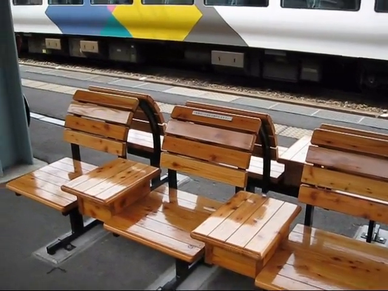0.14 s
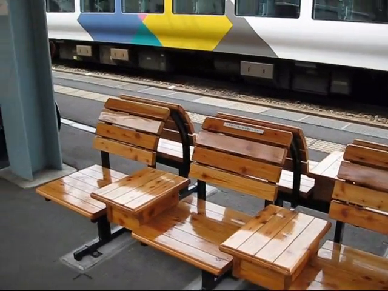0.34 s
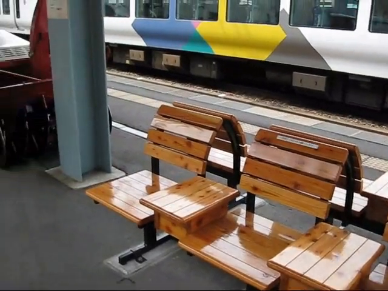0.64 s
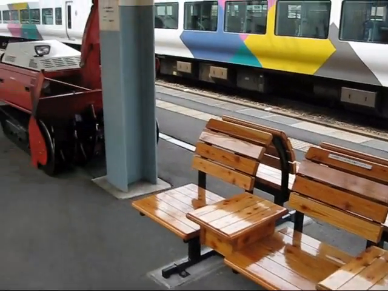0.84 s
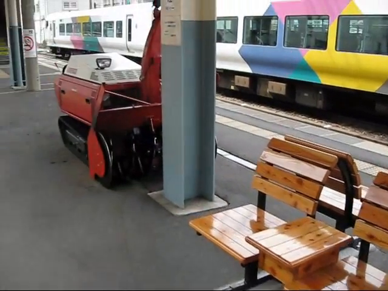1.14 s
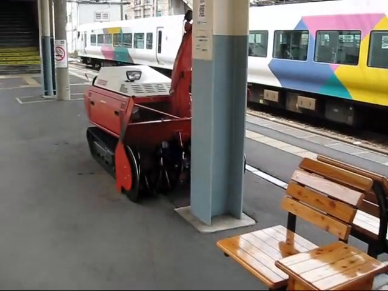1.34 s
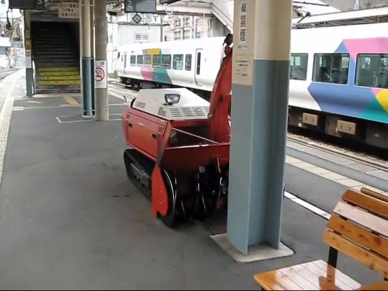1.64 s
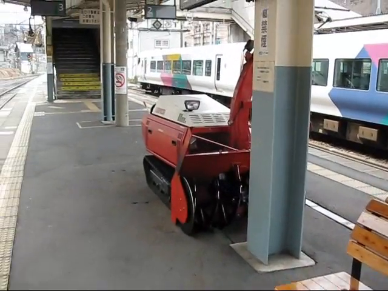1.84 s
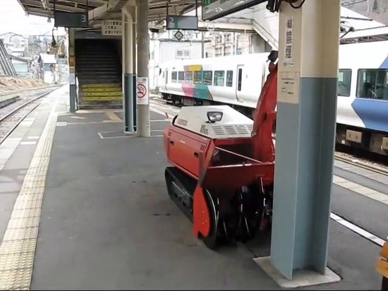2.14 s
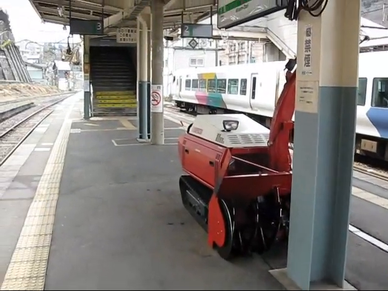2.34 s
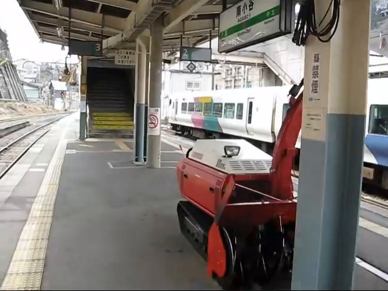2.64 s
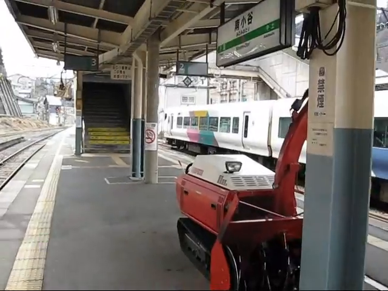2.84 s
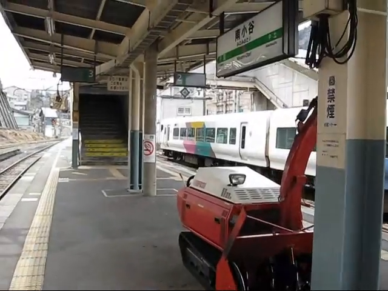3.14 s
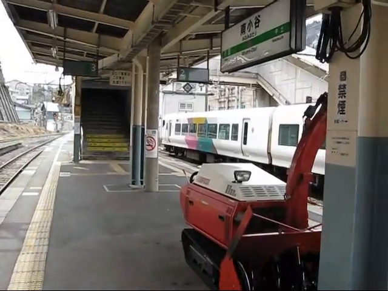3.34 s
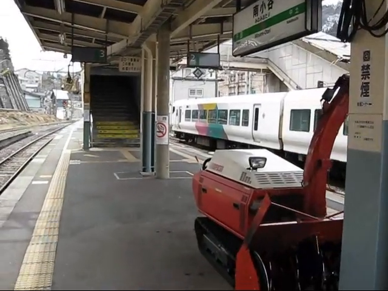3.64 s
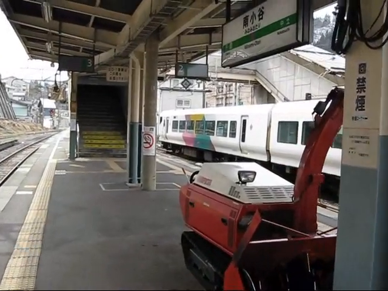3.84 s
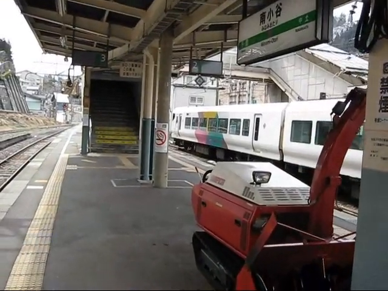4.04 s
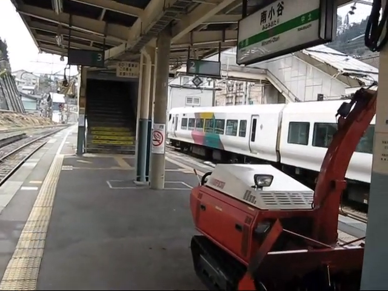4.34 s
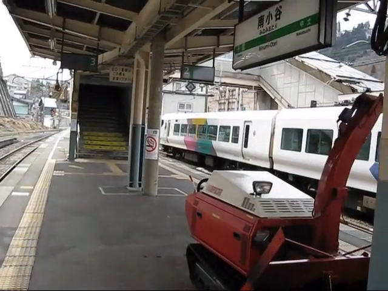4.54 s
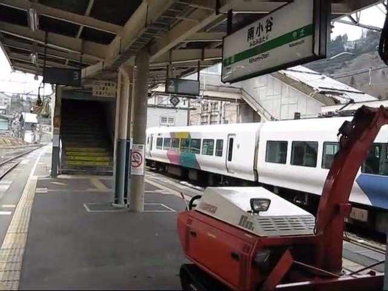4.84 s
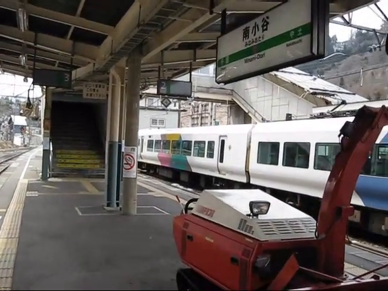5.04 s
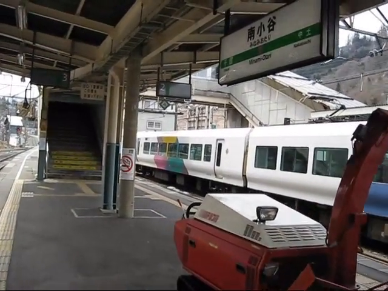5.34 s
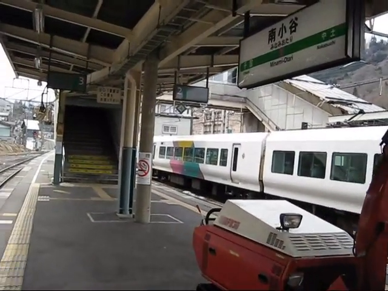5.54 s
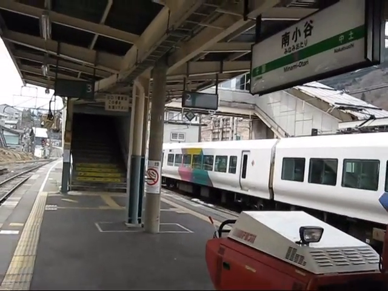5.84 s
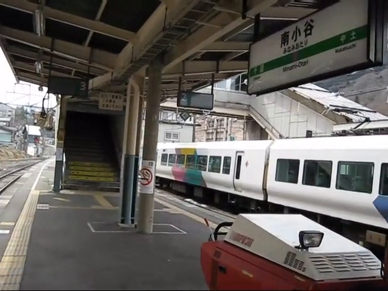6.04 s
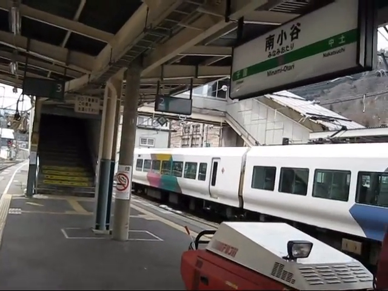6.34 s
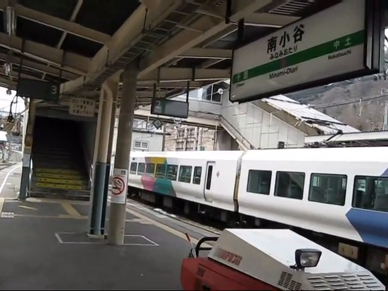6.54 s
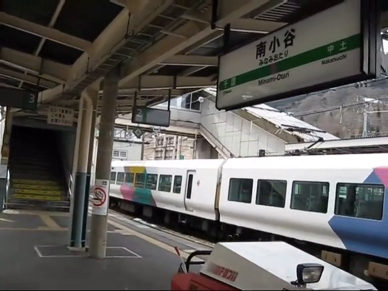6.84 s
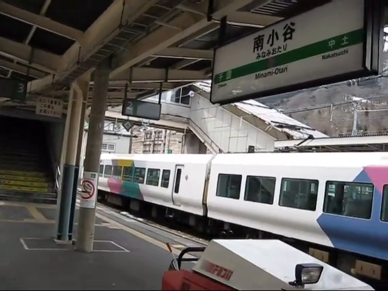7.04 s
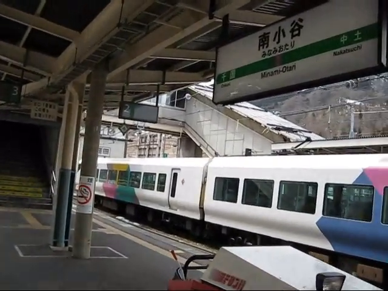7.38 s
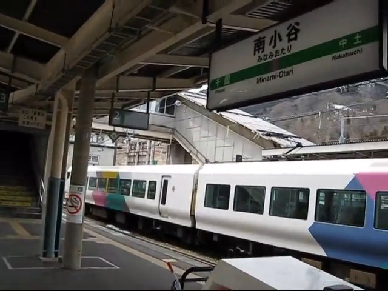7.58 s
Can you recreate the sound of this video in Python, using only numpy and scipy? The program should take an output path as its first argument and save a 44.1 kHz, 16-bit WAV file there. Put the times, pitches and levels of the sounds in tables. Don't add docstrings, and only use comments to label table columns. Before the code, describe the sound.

From 0 to about 7.7 seconds, a stationary electric train runs its equipment beside a roofed outdoor platform. A strong, thin whine around 3 kHz stands over a buzzing casing, fainter higher tones, wavering fan hums and a steady rush of air. At first the whine swells slowly and the sound is brightest; by about 1.4 seconds the treble has dulled a little as the handheld microphone turns away. From about 2.4 seconds echoes make the tones flutter and beat more quickly, continuing to the end. Faint far sparrows chirp at 0.2, 0.7 and 1 second, again around 4.2 to 4.8, at 5.3, and 6.3 to 6.5. Tiny dry plastic ticks occur close by at 3.2 and 6.35. A gentle low wind breath peaks near 5.2. Light hiss remains underneath; the machinery never stops.

```python
import sys
import numpy as np
from scipy import signal
from scipy.fft import rfft, irfft
from scipy.io import wavfile
from scipy.ndimage import uniform_filter1d

SR = 44100
rng = np.random.default_rng(int(sys.argv[2]) if len(sys.argv) > 2 else 0)


def master_out(mix):
    frames = np.transpose(np.atleast_2d(mix))
    ceiling = np.clip(frames, -1, 1)
    pcm = np.round(ceiling * 32767).astype(np.int16)
    wavfile.write(sys.argv[1], SR, pcm)


def field_ratio(decibels):
    return 10 ** (np.asarray(decibels, dtype=float) / 20)


N = 340002
MAINS_HZ = 60
SOUND_SPEED = 343


def walk(rate_hz):
    hold = int(SR / rate_hz)
    steps = np.repeat(rng.standard_normal(N // hold + 1), hold)
    return 1.3 * uniform_filter1d(uniform_filter1d(steps, hold), hold)[:N]


def columns(table):
    s, *rest = np.transpose(table)
    return [np.interp(np.arange(N) / SR, s, column) for column in rest]


def tone(hz, level_db):
    turns = np.cumsum(hz) / SR + rng.random()
    return np.sqrt(2) * field_ratio(level_db) * np.sin(2 * np.pi * turns)


def swells(rows, rest_db):
    t, gain = np.arange(N) / SR, np.full(N, field_ratio(rest_db))
    for peak_s, level_db, length_s in rows:
        i = max(int((peak_s - length_s / 2) * SR), 0)
        j = int((peak_s + length_s / 2) * SR)
        gain[i:j] += field_ratio(level_db) * np.cos(np.pi * (t[i:j] - peak_s) / length_s) ** 2
    return 20 * np.log10(gain)


# time_s, speed_m_per_s
SWING_SPEED = [
    (0, .09),
    (2, .14),
    (3.5, .4),
    (7.71, .45),
]
# mains_multiple, rest_level_db, echo_db
CHOKE_TONES = [
    (24, -60.5, -13),
    (48, -59, -9),
    (52, -52, -14),
    (54, -57.5, -10),
    (56, -52.5, -14),
    (78, -60.5, -8),
    (82, -61.5, -4),
    (84, -62, -5),
]
# peak_s, level_db, length_s
CHOKE_SWELLS_24 = [(0.16, -52.0, 1.1), (0.8, -48.5, 1.1), (2.66, -52.5, 0.45), (4.28, -56.5, 1.1),
                   (4.86, -52.5, 0.6), (5.24, -49.0, 0.34), (5.64, -49.5, 0.8), (6.06, -56.5, 0.8),
                   (6.82, -57.5, 0.6), (7.56, -55.0, 1.1)]
CHOKE_SWELLS_48 = [(0.16, -52.5, 0.8), (0.92, -51.0, 0.45), (1.4, -55.0, 0.8), (1.86, -51.0, 0.45),
                   (2.42, -57.0, 0.8), (2.9, -53.0, 0.26), (5.1, -53.5, 0.26), (5.44, -47.5, 0.2),
                   (5.94, -54.0, 0.8), (6.84, -53.5, 0.8), (7.24, -47.5, 0.26)]
CHOKE_SWELLS_52 = [(0.4, -43.0, 1.1), (1.2, -58.5, 1.1), (1.84, -49.0, 0.6), (2.18, -51.5, 0.34),
                   (2.52, -42.5, 0.34), (2.8, -45.0, 0.26), (2.94, -43.5, 0.2), (3.1, -48.0, 0.26),
                   (3.34, -44.0, 0.16), (3.4, -50.0, 0.12), (3.6, -48.5, 0.34), (3.84, -53.5, 0.16),
                   (4.0, -46.5, 0.16), (4.62, -53.5, 0.26), (4.82, -48.0, 0.2), (5.06, -43.0, 0.2),
                   (5.26, -53.0, 0.45), (5.54, -50.5, 0.2), (5.86, -46.5, 0.34), (6.12, -52.5, 0.6),
                   (6.34, -44.0, 0.2), (6.48, -47.5, 0.16), (6.74, -48.5, 0.16), (7.04, -47.5, 0.8),
                   (7.52, -50.0, 0.6)]
CHOKE_SWELLS_54 = [(0.56, -52.0, 0.8), (1.52, -54.5, 0.26), (1.9, -45.5, 0.6), (2.34, -49.5, 0.34),
                   (2.58, -53.5, 0.2), (2.7, -50.0, 0.2), (2.92, -51.5, 0.26), (3.5, -49.5, 0.2),
                   (3.88, -53.5, 0.8), (4.56, -53.0, 0.6), (5.22, -52.5, 0.8), (5.9, -50.0, 0.8),
                   (6.26, -54.0, 0.2), (6.54, -47.5, 0.45), (7.16, -51.5, 0.26), (7.48, -52.5, 0.16)]
CHOKE_SWELLS_56 = [(0.08, -39.5, 1.1), (0.86, -43.5, 0.34), (1.08, -42.5, 0.45), (1.64, -50.0, 1.1),
                   (2.36, -45.0, 0.16), (2.44, -39.5, 0.12), (2.5, -39.5, 0.12), (2.62, -46.0, 0.26),
                   (2.72, -41.0, 0.2), (2.98, -46.5, 0.2), (3.22, -54.0, 0.34), (3.44, -48.5, 0.2),
                   (3.7, -42.5, 0.45), (4.14, -47.5, 0.45), (4.4, -48.5, 0.6), (4.68, -40.5, 0.16),
                   (4.88, -48.0, 0.45), (5.32, -44.5, 0.2), (5.5, -48.0, 0.34), (5.66, -39.5, 0.2),
                   (5.78, -40.5, 0.16), (6.0, -43.5, 0.34), (6.42, -51.5, 1.1), (7.2, -42.5, 0.2),
                   (7.36, -40.5, 0.16), (7.48, -40.5, 0.16), (7.64, -39.5, 0.2)]
CHOKE_SWELLS_78 = [(0.3, -56.5, 0.6), (0.84, -46.5, 0.45), (1.14, -48.5, 0.26), (1.38, -55.5, 0.26),
                   (2.54, -55.5, 0.16), (3.32, -50.5, 0.16), (3.54, -49.5, 0.16), (4.06, -61.0, 0.6),
                   (4.64, -59.0, 0.45), (5.16, -57.5, 0.6), (5.5, -56.5, 0.26), (6.08, -54.5, 0.16),
                   (6.88, -59.0, 0.6), (7.22, -55.5, 0.16)]
CHOKE_SWELLS_82 = [(0.08, -56, 0.34), (0.88, -57.5, 0.8), (2.26, -66, 0.24), (3.9, -60, 0.54),
                   (4.62, -60, 0.51), (6.5, -69, 0.91), (6.96, -68, 0.8)]
CHOKE_SWELLS_84 = [(0.34, -51, 1.1), (1.12, -57, 0.26), (1.84, -61.0, 0.26), (2.6, -60.5, 0.67),
                   (3.36, -73, 1.2), (6.66, -68, 1.3), (7.48, -68, 1.1)]


def singing_chokes():
    shift = columns(SWING_SPEED)[0] / SOUND_SPEED
    echo_growth_db = 10 * np.log10(shift / shift.max())
    tables = (CHOKE_SWELLS_24, CHOKE_SWELLS_48, CHOKE_SWELLS_52, CHOKE_SWELLS_54,
              CHOKE_SWELLS_56, CHOKE_SWELLS_78, CHOKE_SWELLS_82, CHOKE_SWELLS_84)
    out = 0
    for (multiple, rest_db, echo_db), rows in zip(CHOKE_TONES, tables):
        level_db = swells(rows, rest_db)
        main_hz = MAINS_HZ * multiple * (1 + shift * (.3 * walk(3.0) - .5))
        out = out + tone(main_hz, level_db - .6)
        echo_hz = MAINS_HZ * multiple * (1 + shift * (.5 * walk(1.1) + .7))
        out = out + tone(echo_hz, level_db + echo_db + echo_growth_db + 3 * walk(3.0))
    return out


# mains_multiple, level_db
CASING_BUZZ = [(6, -58), (8, -60), (26, -63), (30, -60), (32, -61), (50, -62), (53, -65), (55, -63),
               (58, -62), (60, -62), (62, -68), (64, -66), (72, -71), (76, -67), (79, -70), (80, -68),
               (86, -70),
               (100, -76), (102, -68), (104, -66), (106, -64), (108, -65), (110, -70), (112, -72),
                    (114, -74), (126, -76), (128, -69), (130, -66), (132, -72), (166, -80), (134, -74),
                    (136, -72), (156, -73), (162, -79), (164, -73), (180, -79), (210, -81)]
BUZZ_DB = 1
COMB_DB = -84


def casing_buzz(near_db, paths=6):
    comb = [(multiple, COMB_DB) for multiple in range(116, 214, 2)]
    rows = np.array(CASING_BUZZ + comb)
    turn = np.arange(16385) / 16384
    shift = columns(SWING_SPEED)[0] / SOUND_SPEED
    out, power = 0, 0
    for speed in np.linspace(-1, 1, paths):
        start = rng.random((len(rows), 1))
        period = field_ratio(rows[:, 1]) @ np.sin(2 * np.pi * (rows[:, :1] * turn + start))
        hz = MAINS_HZ * (1 + shift * (speed + .3 * walk(1.5)))
        gain = field_ratio(5 * walk(1.3))
        out = out + gain * np.interp(np.cumsum(hz) / SR % 1, turn, period)
        power = power + gain ** 2
    return out * field_ratio(BUZZ_DB + near_db) * np.sqrt(2 / power)


# fan_group, pitch_hz, level_in_group_db, wander_hz
BLADE_TONES = [(0, 237, -8, .9), (0, 242.5, .5, 1.3), (1, 636, -1.5, 2.2), (1, 642, -4, 1.5),
               (1, 627, -5, 1.9), (2, 755.7, -2.5, 1.4), (2, 733.5, -3.5, 2.), (2, 721, -5.5, 1.5),
               (2, 742, -9, 2.9), (3, 960, -3, 1.8), (3, 976, -3, 1.6)]
# pitch_hz, level_db, wander_hz
SHAFT_HUMS = [(59.4, -64, 1.18), (133.9, -62, 0.967), (149.8, -69.5, 0.81), (801, -60.5, 2.2),
              (1010, -77, 3.6), (1698, -59.5, 3.4), (1893, -62, 8.4), (2670, -62.5, 7.64)]
FAN_REST_LEVELS = -58, -53, -49, -51.5
FAN_PITCH_CREEP = 0, 0, 0, 1.6
# peak_s, level_db, length_s
FAN_SWELLS_A = [(0.0, -49, 1), (0.68, -46, 1), (1.12, -46, 0.31), (1.52, -49.5, 0.45), (2.14, -65, 3.3),
                (3.12, -52.5, 1.05), (3.92, -50.5, 0.53), (5.9, -45, 0.17), (6.22, -56, 0.57),
                (6.56, -46, 0.19), (7.36, -42.5, 0.14), (7.54, -51.0, 0.14)]
FAN_SWELLS_B = [(0.0, -47.5, 0.45), (0.54, -50, 0.64), (2.4, -51.5, 0.24), (3.34, -57.5, 1.4),
                (4.32, -63.5, 1.3), (5.1, -48, 0.48), (5.96, -72, 1.1), (6.62, -52.5, 1)]
FAN_SWELLS_C = [(0.0, -46, 0.095), (0.28, -51, 0.31), (1.14, -69, 1.6), (1.72, -49.0, 0.4),
                (2.34, -56, 0.26), (3.04, -52, 1.4), (3.54, -51, 0.14), (5.02, -50.5, 0.74),
                (5.5, -53, 0.38), (6.44, -55, 1.3)]
FAN_SWELLS_D = [(1.18, -52, 0.69), (2.1, -56, 0.65), (2.48, -42, 0.2), (2.82, -45.0, 0.16),
                (3.12, -48, 0.34), (3.46, -44, 0.2), (4.06, -50.5, 1.3), (4.8, -45.5, 0.77),
                (6.98, -57, 3.3), (7.52, -58, 0.2)]


def fans():
    tables = FAN_SWELLS_A, FAN_SWELLS_B, FAN_SWELLS_C, FAN_SWELLS_D
    group_db = [swells(rows, rest_db) for rows, rest_db in zip(tables, FAN_REST_LEVELS)]
    since_middle_s = (np.arange(N) - N / 2) / SR
    out = 0
    for group, pitch_hz, db, wander_hz in BLADE_TONES:
        hz = pitch_hz + FAN_PITCH_CREEP[group] * since_middle_s + 1.3 * wander_hz * walk(6.0)
        out = out + tone(hz, group_db[group] + db - 1.5 + 2.2 * walk(8.0))
    for pitch_hz, db, wander_hz in SHAFT_HUMS:
        out = out + tone(pitch_hz + wander_hz * walk(4.0), db + 4 * walk(3.05))
    return out


# pitch_hz, level_db_per_hz
AIR_RUSH = [(18, -104), (30, -78), (100, -76), (200, -70.5), (600, -71.5), (1000, -70.5), (1500, -74.5),
            (2100, -75.5), (2600, -76.5), (3300, -79), (4000, -83), (5000, -86), (5500, -90), (7500, -96)]
# time_s, treble_gain_db (applied about its mean)
FACING_CARS = [
    (0, 2.5),
    (.9, -0.5),
    (1.4, -2),
    (3.3, -3),
    (7.71, -3.5),
]
# pitch_hz, share
FACING_SHARE = [
    (140, 0.043),
    (1200, 0.033),
    (5500, 0.6),
]
# peak_s, added_deep_bass_db, length_s
WIND_GUST = [
    (5.2, 4.0, 1.6),
]


def facing():
    db = columns(FACING_CARS)[0]
    return db - db.mean()


def air_rush():
    f = np.fft.rfftfreq(N, 1 / SR) + 1
    hz, db = np.transpose(AIR_RUSH)
    above_db = -81 * np.log2(np.maximum(f / hz[-1], 1))
    colour = field_ratio(np.interp(np.log(f), np.log(hz), db) + above_db)
    air = rfft(rng.standard_normal(N)) * colour * np.sqrt(SR / 2)
    facing_db = facing()
    share_hz, facing_share = np.transpose(FACING_SHARE)
    out = 0
    for centre_hz in 16 * 2 ** np.arange(0, 10.1, .5):
        band = np.clip(1 - 2 * np.abs(np.log2(f / centre_hz)), 0, 1)
        turn_db = np.interp(np.log(centre_hz), np.log(share_hz), facing_share) * facing_db
        gust_db = (centre_hz < 50) * swells(WIND_GUST, 0) / 2
        out = out + field_ratio(turn_db + gust_db + 0.2 * walk(5.6)) * irfft(air * band, N)
    return out


# start_s, length_s, first_hz, last_hz, level_db
SPARROW_CHIRPS = [(.195, .04, 4650, 4250, -53), (.67, .05, 4600, 4500, -59), (.97, .08, 5250, 5150, -59),
                  (1.05, .12, 5200, 5000, -56), (4.24, .1, 5050, 5200, -61), (4.35, .1, 5200, 5050, -62),
                  (4.52, .1, 5150, 5050, -62), (4.65, .16, 5100, 4900, -59), (5.25, .04, 4650, 4550, -56),
                  (5.31, .07, 4850, 4550, -56), (6.25, .06, 5200, 5000, -59), (6.31, .09, 5250, 5050, -61),
                  (6.42, .08, 5250, 5050, -59)]
CHIRP_DB = 4.5


def sparrows():
    direct = np.zeros(N)
    for start_s, length_s, first_hz, last_hz, db in SPARROW_CHIRPS:
        u = np.linspace(0, 1, int(length_s * SR))
        warble_hz = 100 * np.sin(2 * np.pi * 38 * length_s * u)
        hz = first_hz + (last_hz - first_hz) * u + warble_hz
        chirp = np.sin(np.pi * u) * np.sin(2 * np.pi * np.cumsum(hz) / SR)
        i = int(start_s * SR)
        direct[i:i + len(u)] += field_ratio(db + CHIRP_DB) * chirp
    t = np.arange(SR // 4) / SR
    yard = rng.standard_normal(len(t)) * 1000 ** (-t / .25)
    echoes = signal.fftconvolve(direct, yard / np.sqrt(np.sum(yard ** 2)))[:N]
    return 1.4 * echoes + 1.3 * direct


# start_s, level_db (peak), pitch_hz
SHELL_TICKS = [
    (3.18, -43, 11300),
    (6.348, -44, 11900),
]


def camera_shell():
    out, t = np.zeros(N), np.arange(800) / SR
    for start_s, db, hz in SHELL_TICKS:
        ring = np.sin(2 * np.pi * hz * t) * 1000 ** (-t / .004)
        scrape = np.diff(rng.standard_normal(801), 2, prepend=0) / 2.5
        rattle = .7 * scrape * 1000 ** (-t / .04)
        i = int(start_s * SR)
        out[i:i + 800] += field_ratio(db) * (ring + rattle)
    return out


def scene():
    converter = singing_chokes() + casing_buzz(0.94 * facing())
    return (converter + fans() + air_rush() + sparrows() + camera_shell())[None]


def low_pass(x):
    return signal.sosfilt(signal.butter(12, 12810, fs=SR, output="sos"), x)


HISS_DB = -99
NOTCH_HZ, NOTCH_WIDTH_HZ = 7797, 920


def record(dry):
    settle_db = 2.0 * np.exp(-np.arange(N) / SR / 0.78)
    hiss = field_ratio(HISS_DB + settle_db) * np.sqrt(SR / 2) * rng.standard_normal(dry.shape)
    b, a = signal.iirnotch(NOTCH_HZ, NOTCH_HZ / NOTCH_WIDTH_HZ, SR)
    mix = signal.lfilter(b, a, signal.lfilter(b, a, dry + hiss))
    return low_pass(mix)


dry = scene()
out = record(dry)
master_out(out)
```